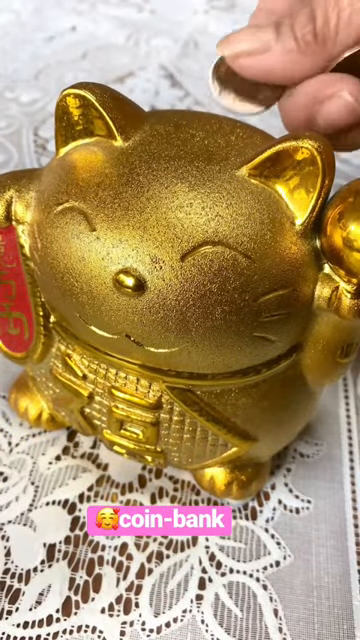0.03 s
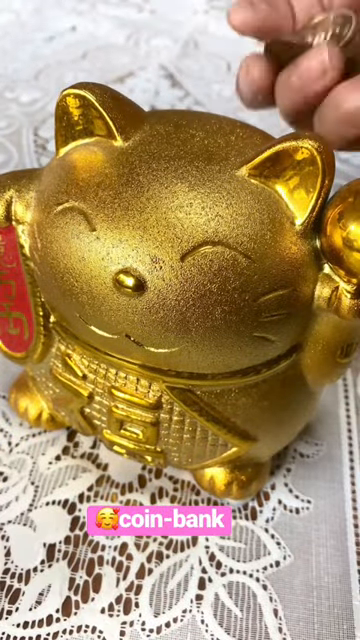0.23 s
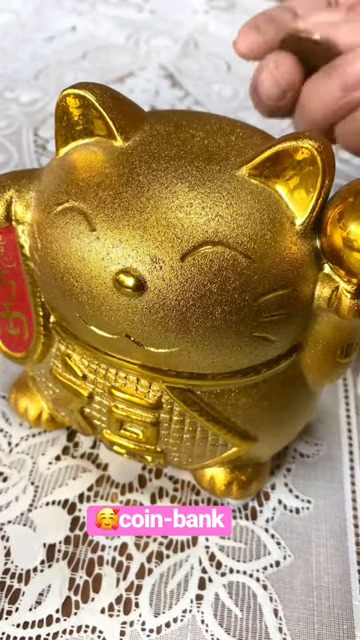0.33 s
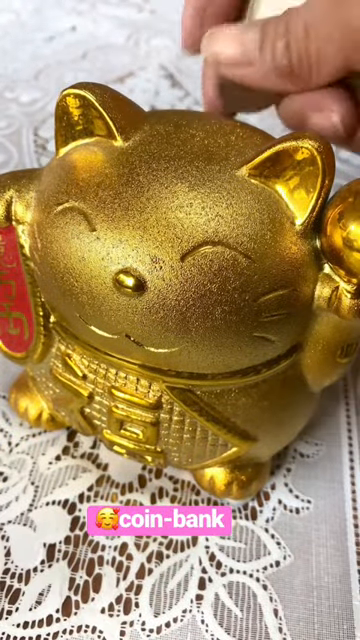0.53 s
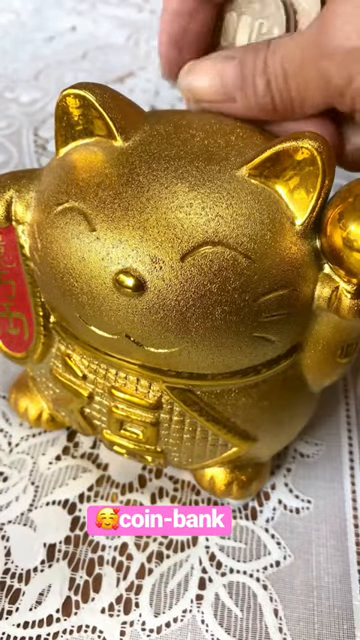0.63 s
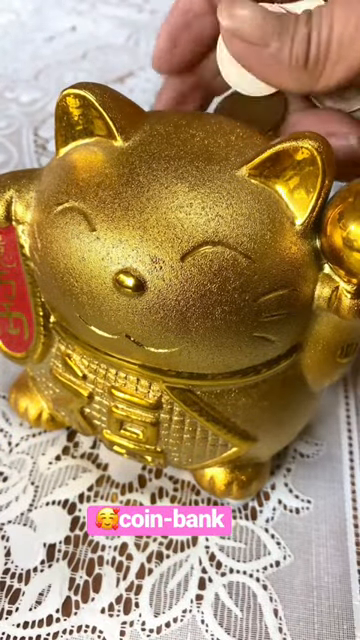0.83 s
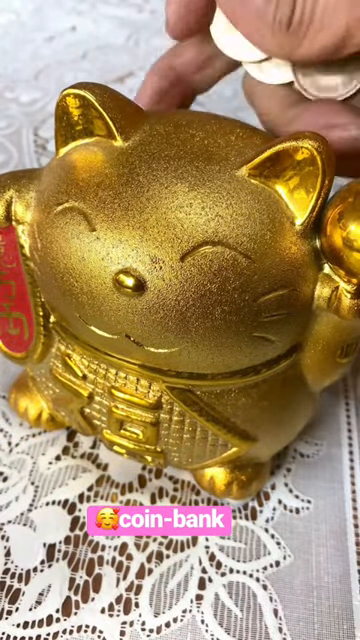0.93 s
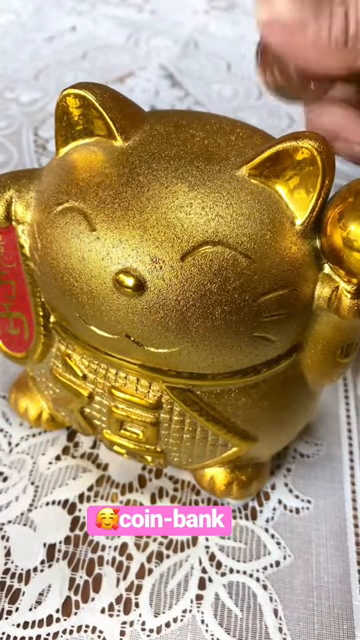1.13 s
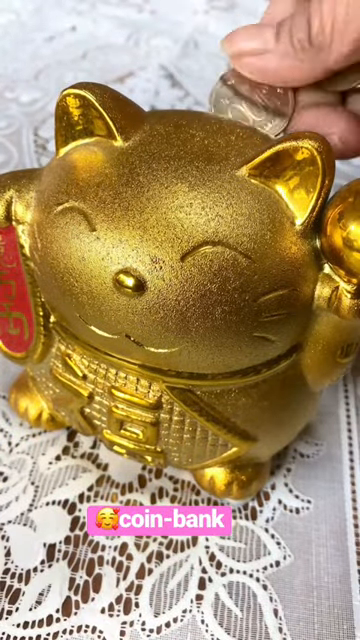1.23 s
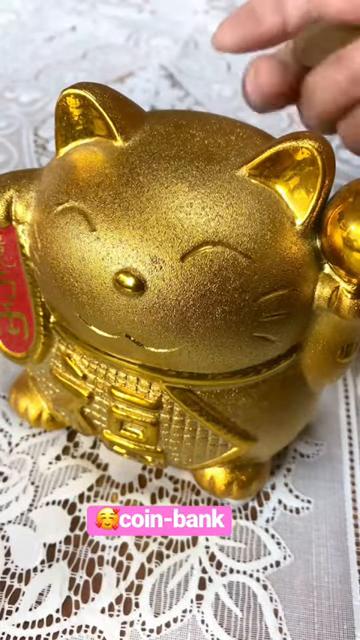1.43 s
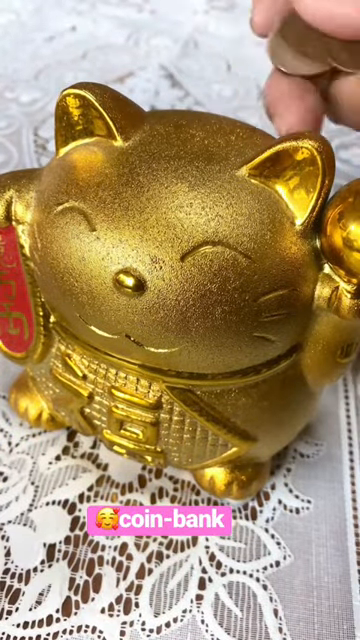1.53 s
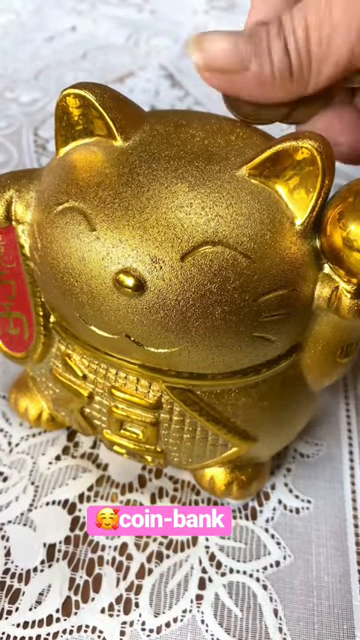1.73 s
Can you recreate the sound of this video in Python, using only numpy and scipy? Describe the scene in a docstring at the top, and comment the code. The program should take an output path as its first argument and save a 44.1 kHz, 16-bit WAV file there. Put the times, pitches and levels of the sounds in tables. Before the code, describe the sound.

Coins clink sharply onto a pile inside a hard hollow coin bank, three drops with short rattles

```python
"""Coins into a hollow bank

Three coins drop through the slot of a hollow coin bank on a cloth-covered table. Each lands on the pile,
bounces and rattles to rest: shell and coins ring as struck sine modes, contacts crack and knock as
bursts of coloured noise, cavity and table thud in low modes. Between drops the fingers shuffle (gritty
noise) and clink (sine modes) the coins still in the hand. Two close microphone ports hear it in stereo.
"""
import sys
import numpy as np
from scipy import signal
from scipy.fft import rfft, irfft
from scipy.io import wavfile
from scipy.ndimage import uniform_filter1d

SR = 44100
rng = np.random.default_rng(int(sys.argv[2]) if len(sys.argv) > 2 else 0)


def int16_out(signal):
    """Quantize to a 16-bit WAV file."""
    q = np.round(np.clip(np.atleast_2d(signal).T, -1, 1) * 32767)
    wavfile.write(sys.argv[1], SR, q.astype(np.int16))


N = 79380
BINS_HZ = np.arange(N // 2 + 1) * SR / N
STRIKE_T = np.arange(SR // 4) / SR  # clock of one struck sound, s

# coin contacts: [t/s, level/dB, low ring/dB, middle rings/dB, top rings/dB, knock of the shell/dB]
CONTACTS = [(0.21, -6, -3, -15, -8.5, -14), (0.2162, -13, -3, -10, -9, -26), (0.244, -23, 2, -1.5, -6, -14),
            (0.2648, -23, -4, -9.5, -6, -15), (0.2952, -14, -5, -12, -10, -11.5),
            (0.3274, -15.5, 0.5, -9, 3, -21.5), (0.3363, -22, 4.5, -27, -8.5, -6.5),
            (0.3527, -26, -9, -9.5, -17, -21), (0.9714, -13, -6.5, -15.5, -15, -19),
            (0.9807, -13.5, -5, -10, 2.5, -11.5), (0.9901, -23.5, -2, -15.5, -12, 0),
            (1.0178, -27.5, -8, -13, -7, 0), (1.0463, -15.5, -11, -17.5, -12, -8),
            (1.058, -19.5, -1, -40, -2, -13), (1.0697, -29, 2.5, -10, 9.5, -24),
            (1.0862, -24.5, -5, -15, -1, -35), (1.1104, -25, -5.5, -17.5, 1, -20),
            (1.3626, -31.5, -29, -31, -21, 5.5), (1.3699, -11, -4, -3.5, -14, -11),
            (1.4082, -24, 0.5, 2.5, -5, -28), (1.4193, -21.5, -1, -2, 3.5, -11.5),
            (1.4937, -19, -7.5, -23, -11.5, -10.5), (1.5388, -22, -5.5, -31, -15.5, -6.5)]
# start of the second and third drop: [t/s]
LATER_DROPS_S = (.9, 1.28)
# coins rattling to rest on the pile, one curve for each drop: [t/s, level/dB]
RATTLE = [
    [(0.0, -56.5), (0.14, -61), (0.3, -43), (0.47, -62.5)],
    [(0.96, -53.5), (1.068, -38.5), (1.19, -69)],
    [(1.36, -45.5), (1.516, -44.5), (1.58, -57)],
]
# modes of shell and coins, the first three being the low ring of the shell: [f/Hz]
RING_HZ = (4578, 4675, 4765, 2690, 3915, 5168, 6200, 6365, 6865, 8576, 9010, 9415, 11645, 12820, 12940,
           15425)
# strength of each of these modes: [first drop level/dB, second drop level/dB, third drop level/dB]
RING_STRENGTH = [(0.5, -1.5, -2.5), (-10.5, -11.5, -8.5), (-11.5, -11, -20), (-24, -24.5, -35),
                 (-17.5, -16, -51), (-19, -7, -43), (-5, 5.5, -6), (-3, 4, -23), (-21, -1.5, -18),
                 (-5.5, -0.5, -14), (-19.5, -16, -14.5), (-17, -3.5, -48), (-17.5, -9.5, -20),
                 (-1.5, -5, -3), (-7, -4.5, -35), (-12, -6, -8)]
TOP_FROM_HZ = 10000
RING_T60_S, RING_RISE_S, RATTLE_RING_DB = 0.064, .005, -0.5
LOW_SCATTER_DB, HIGH_SCATTER_DB = 3.5, 7  # most a mode strays from its level, either way
WAVER = 0.0017  # most a mode strays in pitch, as a share
DAMPING_DB = 9  # a new contact mutes the ring before it
ROUGH, FLUTTER_S = .4, .005  # rms depth of the level flutter, and its smoothing time


def rings():
    """Every contact sets all modes ringing, with slightly new strengths; the rattle keeps them going."""
    hz, modes, out = np.array(RING_HZ), np.array(RING_STRENGTH), np.zeros(N)
    group = (np.arange(len(hz)) >= 3).astype(int) + (hz > TOP_FROM_HZ)  # 0 low, 1 middle, 2 top
    scatter_db = np.where(group > 0, HIGH_SCATTER_DB, LOW_SCATTER_DB)
    chance = rng.random((len(CONTACTS), 3, len(hz)))
    gaps = np.diff([row[0] for row in CONTACTS], append=9)
    for (s, db, *group_db, _), (turn, odd, bend), gap in zip(CONTACTS, chance, gaps):
        drop = np.searchsorted(LATER_DROPS_S, s)
        level = modes[:, drop] + db + np.array(group_db)[group] + scatter_db * (2 * odd - 1)
        pitch = hz * (1 + WAVER * (2 * bend - 1))
        muted = amp(-DAMPING_DB * np.clip((STRIKE_T - gap) / (3 * RING_RISE_S), 0, 1))
        ring = sines(pitch, level, RING_T60_S, RING_RISE_S, 2 * np.pi * turn, rough=ROUGH * (group > 0))
        add(out, s - 2 * RING_RISE_S, muted * ring)
    for drop, rows in enumerate(RATTLE):
        # noise through the modes, with peaks as narrow as twice the ring time gives
        tuned = shaped(rng.standard_normal(N), resonances(hz, modes[:, drop], 2 * RING_T60_S + 0 * hz))
        out += rms_one(tuned) * amp(RATTLE_RING_DB) * spells([rows])
    return out


# relative colour of crack, knock and rattle: [f/Hz, level per Hz/dB]
CLATTER = [(300, -19.5), (1200, -29.5), (1900, -23), (2700, 0.5), (3300, -7), (5500, 1), (7000, -5),
           (10000, -3), (12800, -10.5), (14800, -21.5), (15500, -9.5)]
CRACK_DB, CRACK_T60_S, CRACK_RISE_S = -13, 0.045, 0.0075
KNOCK_T60_S, KNOCK_RISE_S = 0.017, .004
RATTLE_DB, GRAINS_PER_S = -2, 13000


def clatter():
    """Each contact gives a bright crack and a shorter, duller shell knock, over the grain of settling coins."""
    crack, knock = np.zeros((2, N))  # power over time
    for s, db, *_, knock_db in CONTACTS:
        crack_blow = strike(CRACK_T60_S, CRACK_RISE_S)[0]
        knock_blow = strike(KNOCK_T60_S, KNOCK_RISE_S)[0]
        add(crack, s - 2 * CRACK_RISE_S, (amp(db + CRACK_DB) * crack_blow) ** 2)
        add(knock, s - 2 * KNOCK_RISE_S, (amp(db + knock_db) * knock_blow) ** 2)
    rattle = (grains(GRAINS_PER_S, size_db=4.1) * amp(RATTLE_DB) * spells(RATTLE)) ** 2
    white = split(rng.standard_normal((3, N)), np.sqrt(knock + rattle), np.sqrt(crack + rattle))
    return noise_pair(white[0], white[1:], CLATTER)


# thuds of cavity and table: [t/s, level/dB, share by which the pitch starts high and ends low]
THUDS = [(0.128, -44.5, 0), (0.219, -32, 0.034), (0.303, -48, 0), (0.586, -68.5, 0.23),
         (0.646, -61.5, 0.016), (0.711, -51.5, 0.035), (0.977, -28.5, 0), (1.055, -45, 0.031),
         (1.255, -59, 0), (1.375, -34, 0.64), (1.747, -47, 0.0094), (1.778, -49.5, 0)]
# modes of cavity and table top: [f/Hz, level/dB, t60/s]
BODY = [(132.6, 4, 0.085), (110.7, -8, 0.069), (384.3, -10, 0.06)]
THUD_RISE_S, SAG_S = 0.00432, 0.04  # the pitch sags for SAG_S, then holds
LANDING_DB = -40  # thuds from this level up are landings
RUMBLE_DB, RUB_RUMBLE_DB = -10.5, -19.5  # rumble relative to the rattle and to the hand's dull noise


def thuds():
    """Cavity and table top give a few low cycles per thud, and rumble under the rattle and the hand."""
    hz, db, t60 = np.transpose(BODY)
    out = np.zeros(N)
    for s, thud_db, sag in THUDS:
        glide = 1 - 2 * np.minimum(STRIKE_T / SAG_S, 1)
        clock = np.cumsum(1 + sag * (hz < 300)[:, None] * glide[None], axis=1) / SR
        # the upper mode is full only for landings on other coins
        held_back = (hz > 300) & (thud_db < LANDING_DB or s < LATER_DROPS_S[0])
        add(out, s - 2 * THUD_RISE_S, sines(hz, db + thud_db - 20 * held_back, t60, THUD_RISE_S, 0 * hz, clock))
    shaking = amp(RUMBLE_DB) * spells(RATTLE) + amp(RUB_RUMBLE_DB) * rubbing(True)
    rumble = rms_one(shaped(rng.standard_normal(N), resonances(hz, db, t60)))
    return out + rumble * uniform_filter1d(shaking, size=600)


# coins clinking in the hand: [t/s, level/dB, leading f/Hz]
CLINKS = [(.009, -38, 5555), (.036, -37, 4615), (.056, -44.5, 4615), (.085, -35.5, 6390), (.157, -41, 5555),
          (.166, -38, 9430), (.178, -36.5, 12800), (1.225, -50, 4615), (1.313, -48.5, 5190),
          (1.777, -46.5, 5190)]
# modes of the coins in the hand: [f/Hz]
HAND_HZ = (4160, 4615, 5190, 5555, 6390, 8720, 9430, 10560, 12400, 12800, 14080)
CLINK_T60_S, CLINK_RISE_S = 0.064, 0.0046
OTHERS_DB, OTHERS_SCATTER_DB = -13.5, 7  # modes other than the leading one, and how far they stray


def clinks():
    """Each clink in the hand rings one coin mode clearly and the others more faintly."""
    hz, out = np.array(HAND_HZ), np.zeros(N)
    chance = rng.random((len(CLINKS), 2, len(hz)))
    for (s, db, lead_hz), (turn, odd) in zip(CLINKS, chance):
        level = db + OTHERS_DB + OTHERS_SCATTER_DB * (2 * odd - 1)
        level[np.argmin(abs(hz - lead_hz))] = db
        clink = sines(hz, level, CLINK_T60_S, CLINK_RISE_S, 2 * np.pi * turn, rough=ROUGH)
        add(out, s - 3 * CLINK_RISE_S, clink)
    return out


# relative colour of the shuffle: [f/Hz, level per Hz/dB]
FINGERS = [(500, -18.5), (1300, -17.5), (2300, -6), (4000, -0.5), (7000, 3.5), (11000, 6.5), (13000, -4),
           (15500, -15.5)]
GRIT_PER_S, GRIT_DB, FLOOR_DB = 2500, 3.5, -85


def shuffle():
    """Skin and coin faces rub together: gritty hiss over a faint floor."""
    white = rng.standard_normal((3, N)) * grains(GRIT_PER_S, GRIT_DB)
    white = split(white, rubbing(True) + amp(FLOOR_DB), rubbing(False) + amp(FLOOR_DB))
    return noise_pair(white[0], white[1:], FINGERS)


# fingers rubbing the coins in the hand: [t/s, level/dB, swell/s, fade t60/s, dull part relative level/dB]
RUBS = [(0.536,-54,0.0096,0.03,-17.5),(0.676,-65.5,0.0068,0.032,15),(0.737,-64,0.035,0.073,8),(0.816,-54,0.009,0.056,0.5),
        (0.879,-72,0.0055,0.053,16),(0.927,-61,0.024,0.18,11.5),(0.163,-39.5,0.0069,0.081,5.5),(1.317,-46,0.0076,0.094,6),(1.2,-56,0.0032,0.068,-3.5),(1.225,-59,0.0053,0.076,10.5),(1.603,-47,0.0077,0.35,1.5),
        (1.642,-38.5,0.0094,0.12,-11.5),(1.7,-50,0.011,0.055,2.5),(1.747,-65,0.011,0.32,15.5),(1.776,-52,.006,.06,10)]
TICK_DB, TICK_T60_S = -11.5, 0.032  # noise tick of a clink, relative to its ring


def rubbing(dull):
    """Gain over time of the rubs and the ticks of the clinks, for their bright or dull part."""
    power = np.zeros(N)
    for s, db, swell, t60, dull_db in RUBS:
        add(power, s - 3 * swell, (amp(db + dull * dull_db) * strike(t60, swell)[0]) ** 2)
    for s, db, _ in CLINKS:
        tick = amp(db + TICK_DB) * strike(TICK_T60_S, CLINK_RISE_S)[0]
        add(power, s - 3 * CLINK_RISE_S, tick ** 2)
    return np.sqrt(power)


def grains(per_s, size_db):
    """Tiny contacts of uneven size, as a gain of rms 1."""
    sizes = (rng.random(N) < per_s / SR) * amp(size_db * np.minimum(rng.exponential(1, N), 4))
    return rms_one(uniform_filter1d(sizes, size=32) + 0.093)


def spells(tables):
    """Gain over time from several level curves, fading to silence between them."""
    t = np.arange(N) / SR
    gain = sum(amp(curve(rows, t)) * (t >= rows[0][0]) * (t < rows[-1][0]) for rows in tables)
    return uniform_filter1d(gain, size=500)


def strike(t60, rise):
    """Envelope of a blow: bell-shaped rise, peak at three rise times, exponential decay; a row per t60."""
    t = STRIKE_T - 3 * rise
    swell = np.exp(-(np.minimum(t, 0) / rise) ** 2)
    return swell * amp(-60 * np.maximum(t, 0) / np.maximum(np.reshape(t60, (-1, 1)), .005))


def sines(hz, db, t60, rise, phase, t=STRIKE_T, rough=0):
    """Sum of struck modes; t is the clock of their oscillation; rough modes flutter as the coins chatter."""
    span = int(FLUTTER_S * SR)
    smooth = uniform_filter1d(rng.standard_normal((len(hz), SR // 4)), size=span)
    flutter = rms_one(uniform_filter1d(smooth, size=span))
    wave = np.sin(2 * np.pi * hz[:, None] * t + phase[:, None])
    wave = wave * (1 + np.reshape(rough, (-1, 1)) * flutter)
    return np.sum(amp(db)[:, None] * strike(t60, rise) * wave, axis=0)


def resonances(hz, db, t60):
    """Peaks on the FFT bins, as wide as their decay makes them."""
    return sum(amp(d) / (1 + 1j * (BINS_HZ - f) * 2 * np.pi * t / np.log(1000))
               for f, d, t in zip(hz, db, t60))


def split(white, dull_gain, bright_gain):
    """Noise with one envelope for its dull part and another for its bright part."""
    low = 1 / (1 + (BINS_HZ / 3500) ** 4)  # crossover at 3500 Hz
    return shaped(white * dull_gain, low) + shaped(white * bright_gain, 1 - low)


# noise of each side's own, relative to the shared noise: [f/Hz, level/dB]
APART = [(100, -11.5), (1000, -7), (2500, -17), (8000, -36), (15000, -4)]


def noise_pair(white, own, rows):
    """Coloured noise, mostly shared, with a part of its own on each side."""
    tint = colour(rows) / np.sqrt(np.mean(colour(rows) ** 2))
    return shaped(white, tint), shaped(own, tint * colour(APART))


def amp(db):
    """Gain of a dB value."""
    return 10 ** (np.asarray(db) / 20)


def curve(rows, at, warp=np.asarray):
    """Straight lines between the rows of a table."""
    x, y = np.transpose(rows)
    return np.interp(warp(at), warp(x), y)


def colour(rows):
    """A dB table as gains on the FFT bins, interpolated over log frequency."""
    return amp(curve(rows, np.maximum(BINS_HZ, 10), np.log))


def shaped(x, gain):
    """Filter by a gain given for every FFT bin."""
    return irfft(rfft(x) * gain, N)


def rms_one(x):
    """Scale to rms 1."""
    return x / np.sqrt(np.mean(x ** 2) + 1e-20)


def add(out, s, sound):
    """Mix a sound in at s seconds."""
    i = int(s * SR)
    sound = sound[max(-i, 0):len(out) - i]
    out[max(i, 0):max(i, 0) + len(sound)] += sound


# phase by which the left port leads: [f/Hz, lead/rad]
LEAD = [(0, 0), (4200, 1.09), (4800, 0.66), (6700, 4.5), (8000, 2.5), (9700, 7.5), (12400, 7), (14400, 19),
        (15600, 2.5)]
# level of left minus right: [f/Hz, level/dB]
LEAN = [(130, 0), (500, -1.5), (1600, -0.5), (2600, -3), (4600, -4.5), (6500, -2), (15000, 0.9)]


def scene():
    """The sound reaches the two ports with a lead and lean that depend on pitch."""
    (crack, crack_own), (hand, hand_own) = clatter(), shuffle()
    shared = rings() + clinks() + crack + hand + thuds()
    half = np.exp(.5j * curve(LEAD, BINS_HZ)) * colour(LEAN) ** .5  # each port takes half the difference
    return shaped(shared, np.array([half, 1 / half])) + crack_own + hand_own


LOW_CUT_HZ, CUTOFF_HZ = 44, 16100


def record(dry):
    """The microphones lose the deepest bass; the top is cut steeply."""
    thin = signal.sosfilt(signal.butter(2, LOW_CUT_HZ, "high", fs=SR, output="sos"), dry)
    return signal.sosfilt(signal.cheby2(14, 70, CUTOFF_HZ, fs=SR, output="sos"), thin)


dry = scene()
out = record(dry)
int16_out(out)
```